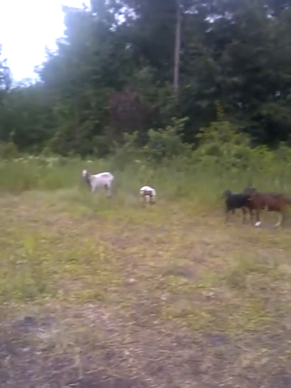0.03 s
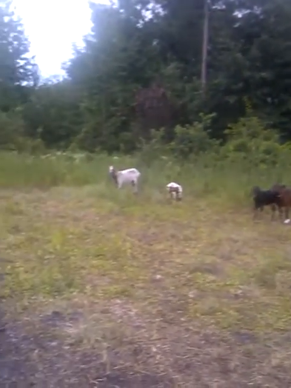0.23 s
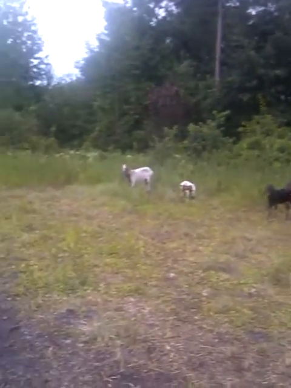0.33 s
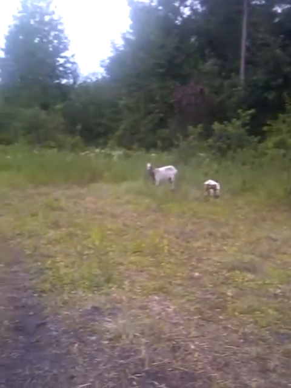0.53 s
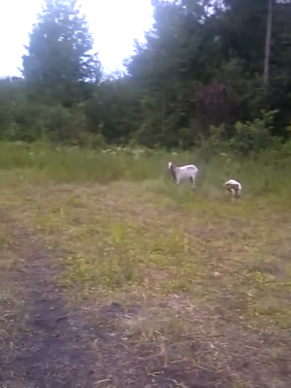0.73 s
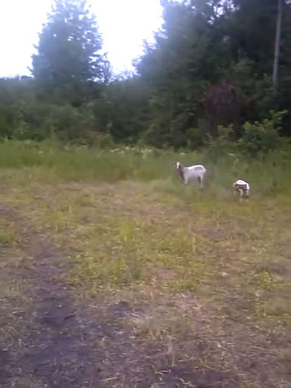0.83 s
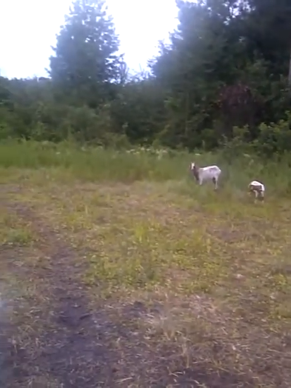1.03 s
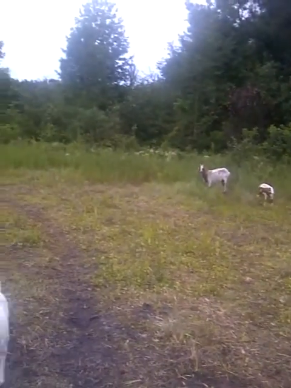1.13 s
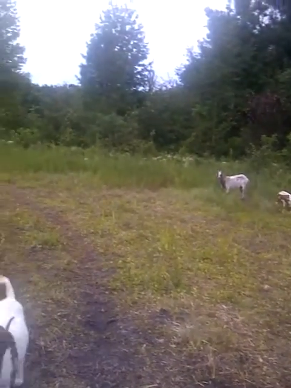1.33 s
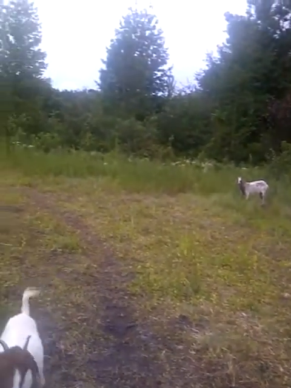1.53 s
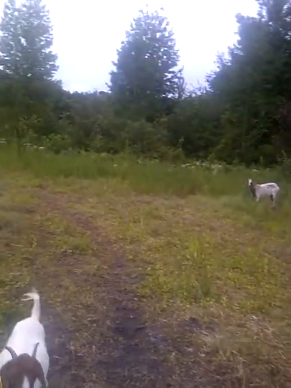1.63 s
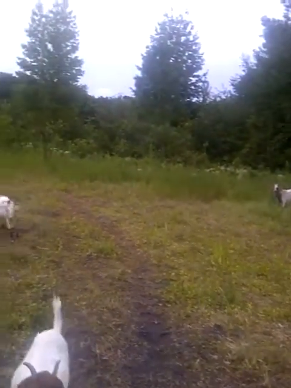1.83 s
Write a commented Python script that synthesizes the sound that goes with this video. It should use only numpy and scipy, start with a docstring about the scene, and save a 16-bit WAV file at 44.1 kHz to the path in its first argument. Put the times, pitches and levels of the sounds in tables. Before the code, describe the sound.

A goat gives one loud, quavering bleat that cracks at the start and drops in pitch at the end. Faint grass crackles and soft steps follow, with distant insects and steady air hiss in an open field.

```python
"""Goat in a summer field

Out in the open, a goat bleats once, well in front of the background on a single microphone. Vocal-fold
pulses and rasp ring its throat: a quavering call that cracks at the start and drops in pitch as it ends.
Insects buzz high in the grass, one near and many far off, over a soft rumble and hiss of air.
A few soft steps fall, and dry grass crackles underfoot."""
import sys
import numpy as np
from scipy import signal
from scipy.fft import rfft, irfft
from scipy.io import wavfile

SR = 44100
rng = np.random.default_rng(int(sys.argv[2]) if len(sys.argv) > 2 else 0)


def store_pcm(level_fs):
    """Save levels as 16-bit WAV."""
    pcm = np.round(np.clip(level_fs, -1, 1) * 32767).astype(np.int16)
    wavfile.write(sys.argv[1], SR, np.atleast_2d(pcm).T)


N = 83790

# wash of air over the field (frequency [Hz], relative level [dB])
AIR_SPECTRUM = [(15, -30), (25, -0.5), (80, -4.5), (157, 0), (239, -6), (275, -3), (363, -9), (503, -9),
                (665, -12), (879, -14), (2500, -20), (6500, -22.5), (8450, -54), (14300, -120)]
# drift of the low rumble (time [s], gain [dB])
RUMBLE_GAIN = [(0, -1), (.4, -1), (.88, -0.5), (1.05, -3), (1.3, -2), (1.55, 0), (1.72, 0), (1.9, -1.5)]
# fine hiss above the wash (frequency [Hz], relative level [dB])
HISS_SPECTRUM = [(20, -61), (4500, -23), (6500, -3), (8300, -4.5), (10000, -7.5), (12500, -8),
                 (15500, -9.5)]
# one insect near the microphone (time [s], level [dB])
BUZZ_LEVEL = [(0, -66.5), (.4, -67), (.9, -70), (1.3, -71), (1.9, -72.5)]
# insects farther out in the field (time [s], level [dB])
CHORUS_LEVEL = [(0, -68.5), (.5, -68), (1.0, -68), (1.4, -70), (1.65, -68.5), (1.9, -70)]
# stalks brushing together (time [s], half length [s], level [dB], centre [Hz])
BRUSHES = [(0.075, 0.018, -82, 5000), (.401, 0.0052, -59.5, 10000), (.945, 0.015, -63, 9500),
           (0.99, 0.029, -64, 5500), (1.153, 0.032, -68, 5500), (1.34, 0.026, -71, 4800),
           (1.6, .018, -66.5, 7500), (1.86, 0.012, -69, 4500)]
# dry stalks snapping (time [s], level [dB], centre [Hz], decay [s])
SNAPS = [(0.401, -59, 6500, 0.009), (0.816, -56.5, 2260, 0.0081), (0.9296, -48.5, 5350, 0.00072),
         (0.9411, -47, 3280, 0.0011), (0.9479, -50, 3480, 0.0017), (0.9612, -54, 4100, 0.0028),
         (1.4647, -56, 4050, .004), (1.594, -53.5, 4280, 0.0043), (1.605, -55.5, 3000, 0.0048)]
# pitch of the bleat, quavering about ten times a second (time [s], pitch [Hz])
BLEAT_PITCH = [(0.198, 284.7), (0.23, 324.7), (0.242, 340.4), (0.256, 310.5), (0.276, 330.7), (0.32, 324),
               (0.336, 337.5), (0.364, 349.9), (0.384, 344), (0.402, 322), (0.418, 323.8), (0.436, 326.7),
               (0.46, 341.4), (0.476, 342.6), (0.514, 331.5), (0.578, 339.8), (0.614, 326.6),
               (0.666, 337.1), (0.682, 332.5), (0.698, 318.4), (0.72, 333.5), (0.726, 324.7),
               (0.752, 296.5), (0.766, 270.4), (0.786, 240.6), (0.804, 234)]
# hoarseness: rasp against the clear tone at the vocal folds (time [s], relative level [dB])
RASP_LEVEL = [(.19, -13), (.218, -15), (.23, -25), (.244, -25), (.254, -10), (.268, -16), (.285, -22),
              (.305, -22), (.32, -16), (.345, -26), (.37, -26), (.39, -16), (.42, -26), (.55, -31),
              (.67, -28), (.71, -19), (.75, -20), (.8, -20)]
# lift or cut of the highest overtones ahead of the throat (time [s], gain [dB])
SHEEN_GAIN = [(.2, -3.5), (.3, -7), (.37, -3.5), (.43, 5), (.48, 3.5), (.53, 6), (.58, 11), (.61, 8.5),
              (.665, 14), (.72, 3), (.8, -7)]
# throat resonances in the nasal onset (frequency [Hz], width [Hz], relative level [dB])
THROAT_NASAL = [(278, 51, -11), (663, 200, 1.5), (987, 64, -4), (1150, 170, -10), (1470, 64, -8),
                (1650, 81, 0), (1886, 200, -11.5), (2300, 160, -16), (2635, 200, -9.5), (2960, 196, 3),
                (3280, 93, -10.5), (3580, 230, -11.5), (4160, 130, -16.5)]
# the same with the mouth open (frequency [Hz], width [Hz], relative level [dB])
THROAT_OPEN = [(278, 150, -23.5), (708, 254, 3.5), (1024, 164, 0), (1415.5, 91, -1.5), (1674, 160, 0),
               (2020, 127, -10.5), (2353, 140, -2), (2646, 296, 5.5), (2969, 130, 10.5), (3278, 48, -0.5),
               (3558, 130, -1.5), (3705, 63, -12), (4137, 300, -15.5), (4660, 1700, -25.5)]
# the same with the mouth nearly shut (frequency [Hz], width [Hz], relative level [dB])
THROAT_SHUT = [(249, 51, -11.5), (560, 430, -17.5), (728, 120, 6), (1150, 150, -12.5), (1440, 210, 4),
               (2570, 150, -8.5), (2940, 180, -19), (3300, 430, -27)]
# band levels of the bleat at the microphone (time [s], body [dB], middle [dB], treble [dB])
BLEAT_LEVELS = [(0.19, -52, -84, -82), (0.196, -47, -79, -70), (0.208, -41.5, -51.5, -48),
                (0.238, -31, -37.5, -27), (0.258, -39, -45.5, -40), (0.292, -37.5, -37.5, -32.5),
                (0.32, -36, -43, -40), (0.346, -32, -36, -34), (0.374, -32, -36, -35.5),
                (0.424, -37.5, -44.5, -41.5), (0.464, -32, -36.5, -39.5), (0.538, -36, -40.5, -42.5),
                (0.584, -34.5, -38.5, -47), (0.614, -38.5, -46, -42.5), (0.664, -36, -39, -47.5),
                (0.688, -37, -44, -44), (0.704, -40.5, -50.5, -53), (0.718, -39, -44.5, -50),
                (0.732, -42.5, -48.5, -49.5), (0.744, -47.5, -48, -50.5), (0.758, -41.5, -40, -53),
                (0.776, -39, -55, -52.5), (0.788, -38.5, -46, -57), (0.798, -38.5, -49, -50.5),
                (0.808, -49.5, -64, -66), (0.815, -71, -69, -60)]
# footfalls on soft ground (time [s], half length [s], level [dB])
STEPS = [(0.381, 0.0176, -59), (0.941, 0.01, -67), (1.712, 0.021, -64.5)]


def amp(db):
    """Decibels to gain."""
    return 10 ** (np.asarray(db) / 20)


def unit(x):
    """Scales to an rms of one."""
    return x / np.sqrt(np.mean(x ** 2) + 1e-20)


def clock():
    """Time of every sample."""
    return np.arange(N) / SR


def curve(table, column=1):
    """One column of a time table at every sample."""
    table = np.array(table)
    return np.interp(clock(), table[:, 0], table[:, column])


def swell(middle_s, half_s):
    """Bell-shaped rise and fall."""
    return np.exp(-((clock() - middle_s) / half_s) ** 2)


def spectrum(points):
    """Gain against frequency from (frequency [Hz], level [dB]) points."""
    hz, db = np.transpose(points)
    return lambda f: amp(np.interp(np.log(f + 1), np.log(hz + 1), db))


def shaped(x, gain):
    """Filters by a gain that is a function of frequency."""
    return irfft(rfft(x, 2 * N) * gain(np.fft.rfftfreq(2 * N, 1 / SR)))[:N]


def noise(gain):
    """Noise of rms one with the given colour."""
    return unit(shaped(rng.standard_normal(N), gain))


def below(hz, order=4):
    """Low-pass gain."""
    return lambda f: 1 / (1 + (f / hz) ** order)


def around(hz, width_hz):
    """Gain of one resonance."""
    return lambda f: 1 / (1 + (2 * (f - hz) / width_hz) ** 2)


def air():
    """Open air: a soft wash with a drifting rumble, under a steady fine hiss."""
    wash = amp(-60.5) * noise(spectrum(AIR_SPECTRUM))
    rumble = shaped(wash, below(400))
    hiss = amp(-69) * noise(spectrum(HISS_SPECTRUM))
    return wash - rumble + rumble * amp(curve(RUMBLE_GAIN)) + hiss


def near_insect(strokes_per_s=63.8, top_hz=9360, sag_hz=650, wander_hz=103.5):
    """Close by in the grass, each wing stroke makes a short arch in pitch and level."""
    stroke = np.minimum((clock() * strokes_per_s % 1) / 0.93, 1)  # runs 0 to 1, then rests briefly
    arch_hz = top_hz - sag_hz * (2 * (stroke - 0.42)) ** 2
    phase = 2 * np.pi * np.cumsum(arch_hz + wander_hz * noise(below(600))) / SR
    pulses = abs(np.sin(np.pi * stroke)) ** 0.76
    flicker = 1 + 0.28 * noise(below(500))
    return unit(pulses * np.sin(phase) * flicker) * amp(curve(BUZZ_LEVEL))


def far_insects():
    """Farther off, many insects merge into one fluttering band."""
    band = noise(around(7494, width_hz=440))
    flutter = np.exp(0.27 * noise(below(72.4)))
    return unit(band * flutter) * amp(curve(CHORUS_LEVEL))


def grass():
    """Dry stalks underfoot snap in sharp bursts and brush together in grainy swells."""
    t, out = clock(), np.zeros(N)
    for start, db, hz, decay in SNAPS:
        burst = (t >= start) * np.exp(-abs(t - start) / decay)
        out += amp(db) * noise(around(hz, width_hz=5000)) * burst
    grains = unit(amp(2.5 * noise(below(720))))
    for middle, half, db, hz in BRUSHES:
        out += amp(db) * grains * noise(around(hz, width_hz=5800)) * swell(middle, half)
    return out


def vocal_folds(jitter=0.04, shimmer=0.6, waver_hz=135, puff_decay_cycles=0.73):
    """Each cycle gives a pulse and a puff of rasp; the hoarser the voice, the less even the pulses."""
    rasp = amp(curve(RASP_LEVEL))
    hz = curve(BLEAT_PITCH) * (1 + jitter * rasp * noise(below(waver_hz)))
    cycles = np.cumsum(hz) / SR
    pulses = unit(sum(np.cos(2 * np.pi * k * cycles) for k in range(1, 25)))
    pulses *= 1 + shimmer * rasp * noise(below(waver_hz))
    puff_shape = 0.2 + np.exp(-(cycles % 1) / puff_decay_cycles)
    puffs = unit(puff_shape * noise(below(4270, order=6)))
    drive = pulses + rasp * puffs
    dull = shaped(drive, below(3630, order=16))
    return dull + (drive - dull) * amp(curve(SHEEN_GAIN))


def throat(drive, resonances, skirt=1.24, size=4096):
    """The resonances of throat and mouth ring after each pulse."""
    f = abs(np.fft.fftfreq(size, 1 / SR))
    peaks = sum(amp(db) * around(hz, width)(f) ** skirt for hz, width, db in resonances)
    floor = amp(-27) * below(5240)(f)
    nose_notch = 1 - 0.98 * around(3080, width_hz=82)(f)  # the nose is a side branch
    low_cut = 1 - below(170)(f)
    log_gain = np.log((peaks + floor) * nose_notch * low_cut + 1e-5)
    minimum_phase = np.exp(np.conj(signal.hilbert(log_gain)))  # no ringing ahead of a pulse
    ring = np.fft.ifft(minimum_phase).real[:size // 2]
    return signal.fftconvolve(drive, ring)[:N]


def quaver(voice, body_top_hz=1150, middle_top_hz=2200, attack_s=0.012, release_s=0.016):
    """Body, middle and treble of the voice swell and sink, between a quick start and a quick stop."""
    body = shaped(voice, below(body_top_hz, order=16))
    under_treble = shaped(voice, below(middle_top_hz, order=16))
    window = signal.get_window("hann", int(SR / 60))
    t, out = clock(), np.zeros(N)
    for column, band in enumerate([body, under_treble - body, voice - under_treble], start=1):
        power = signal.fftconvolve(band ** 2, window / window.sum(), "same")
        levelled = band / np.sqrt(abs(power) + 1e-12)
        out += levelled * amp(curve(BLEAT_LEVELS, column))
    fade_in = np.clip((t - BLEAT_LEVELS[0][0]) / attack_s, 0, 1)
    fade_out = np.clip((BLEAT_LEVELS[-1][0] - t) / release_s, 0, 1)
    return out * fade_in * fade_out


def goat(opening_s=(0.287, 0.337), shutting_s=(0.696, 0.768)):
    """The vocal folds drive a throat that is first nasal, then open, then nearly shut."""
    drive = vocal_folds()
    opened = np.interp(clock(), opening_s, [0, 1])
    shut = np.interp(clock(), shutting_s, [0, 1])
    shapes = [(1 - opened, THROAT_NASAL), (opened - shut, THROAT_OPEN), (shut, THROAT_SHUT)]
    return quaver(sum(share * throat(drive, resonances) for share, resonances in shapes))


def field_scatter(call, gain_db=-36, t60_s=0.4):
    """Ground and trees scatter a weak, dull tail of the call back to the microphone."""
    tail = noise(below(2600)) * amp(-60 * clock() / t60_s)
    return amp(gain_db) * signal.fftconvolve(call, tail / np.linalg.norm(tail))[:N]


def footsteps():
    """Dull pushes of feet on soft ground."""
    pushes = sum(amp(db) * swell(middle, half) for middle, half, db in STEPS)
    return noise(below(236)) * pushes


def scene():
    """The field from one spot, in mono: the goat in front, air, insects and feet low behind it."""
    bleat = goat()
    background = air() + near_insect() + far_insects() + grass() + footsteps()
    return (bleat + field_scatter(bleat) + background)[None]


def record(dry, edge_hz=15600):
    """The recorder cuts off the highest treble from the microphone."""
    low_pass = signal.firwin(511, edge_hz, window=("kaiser", 9), fs=SR)
    return signal.oaconvolve(dry, low_pass[None], "same")


dry = scene()
out = record(dry)
store_pcm(out)
```